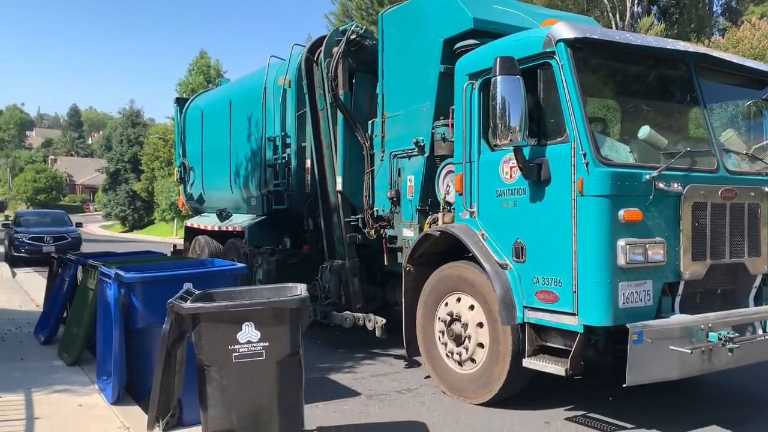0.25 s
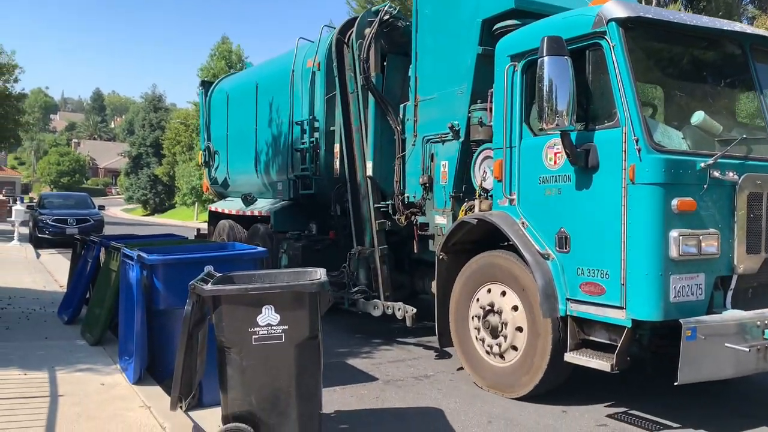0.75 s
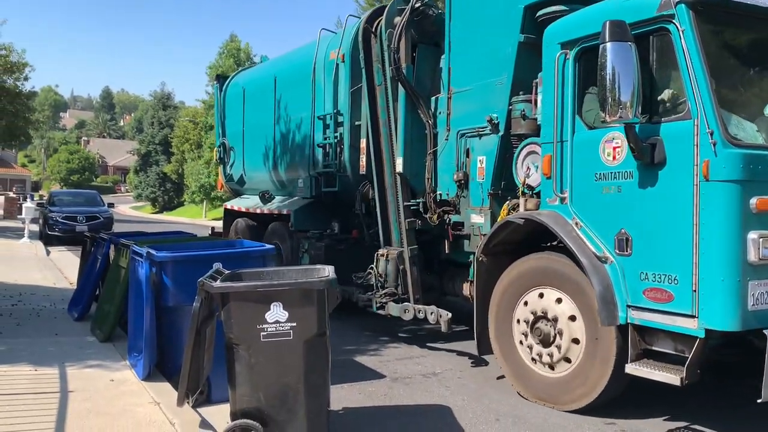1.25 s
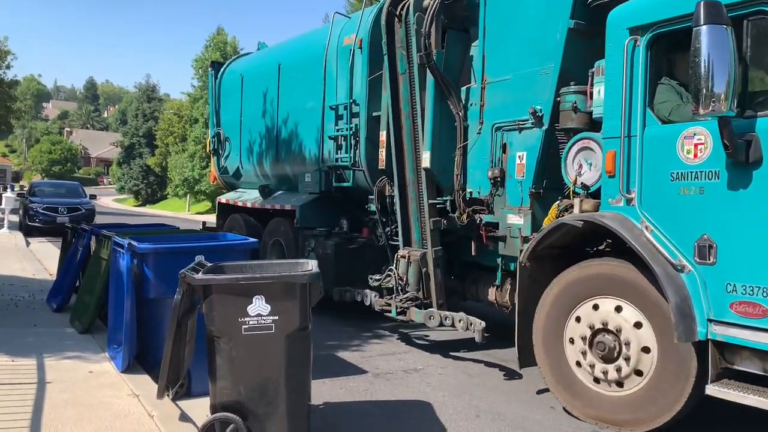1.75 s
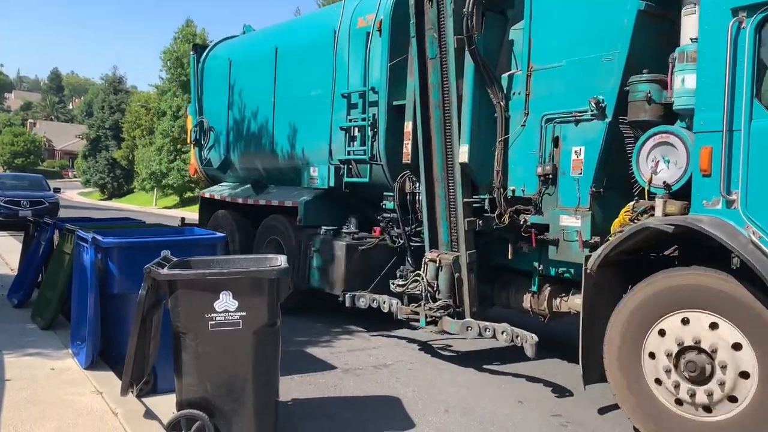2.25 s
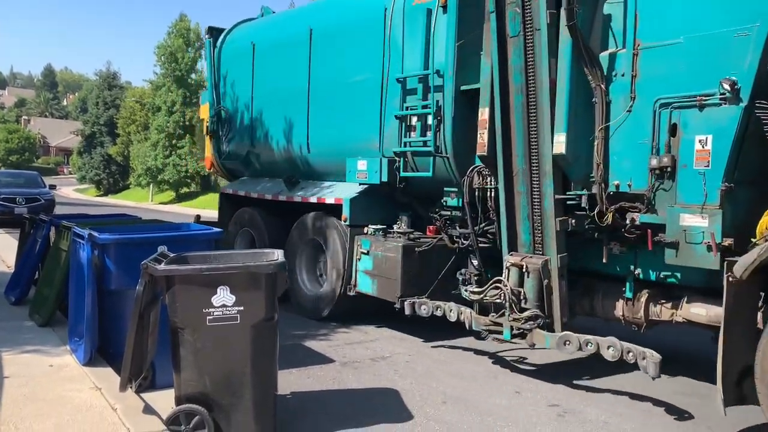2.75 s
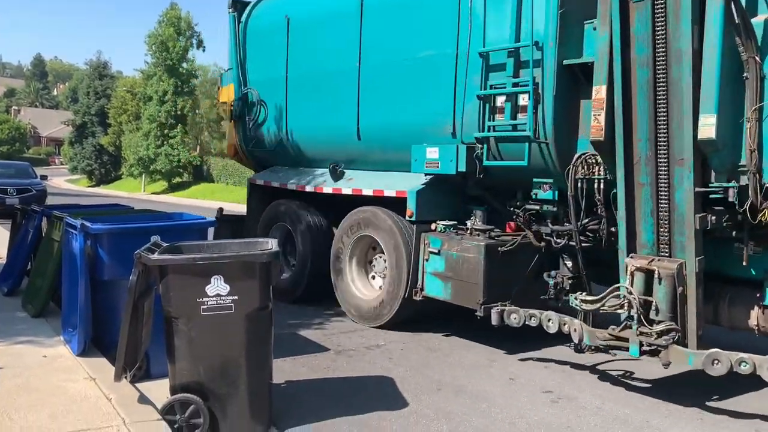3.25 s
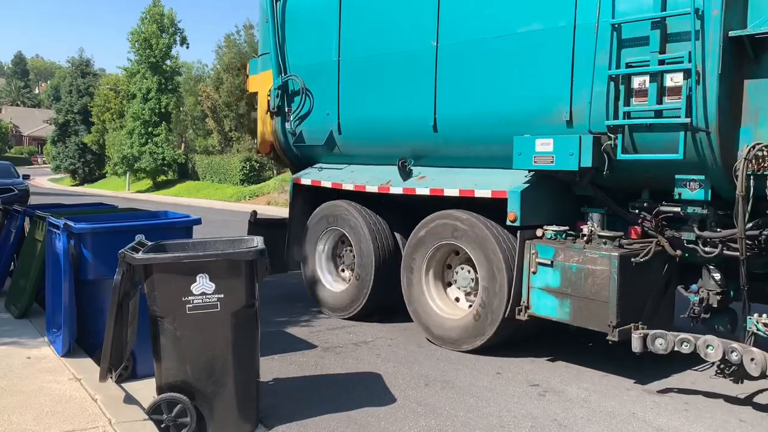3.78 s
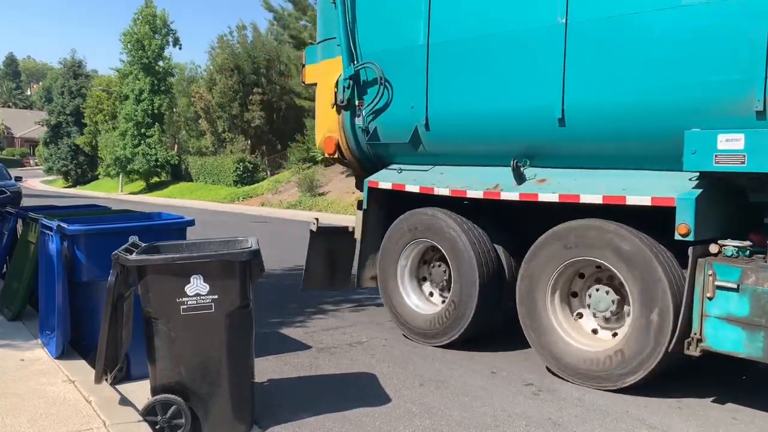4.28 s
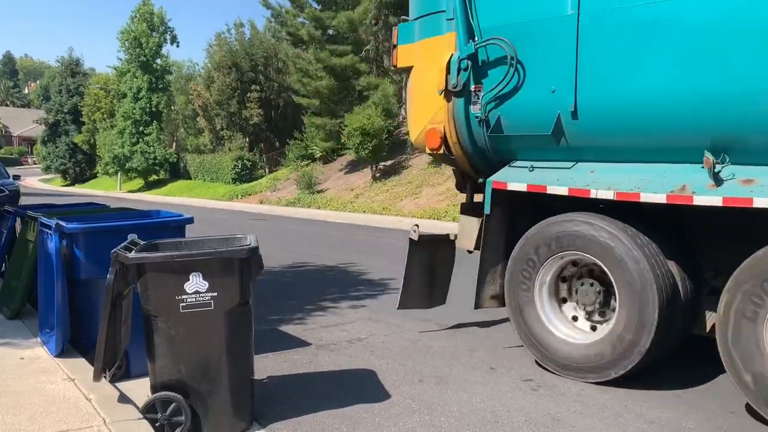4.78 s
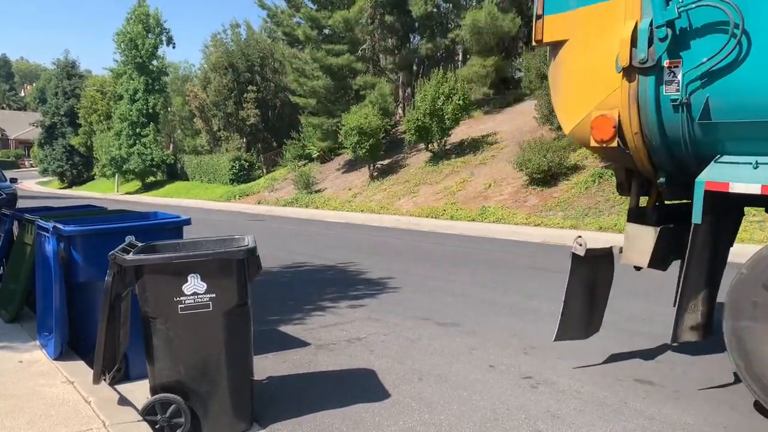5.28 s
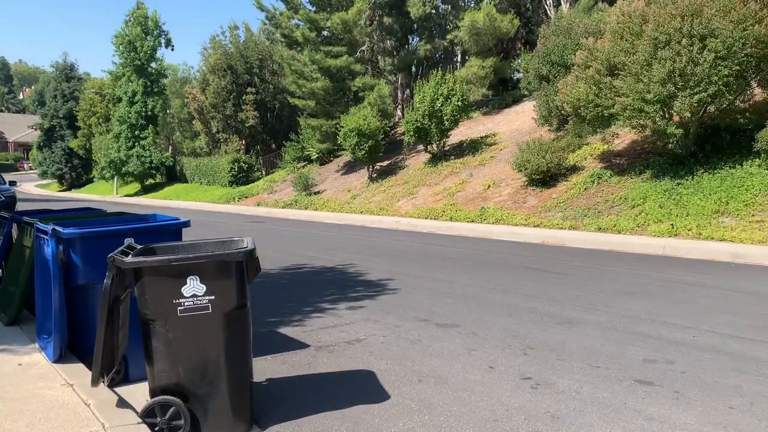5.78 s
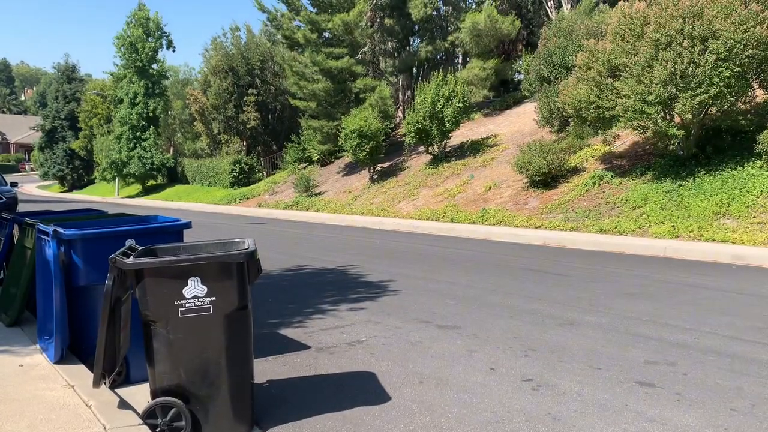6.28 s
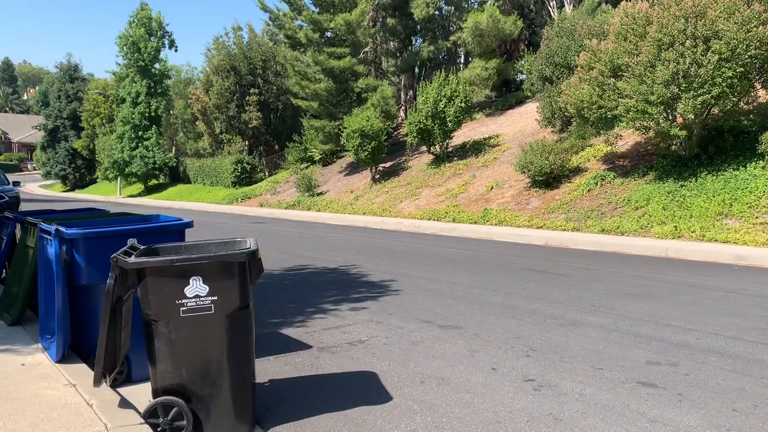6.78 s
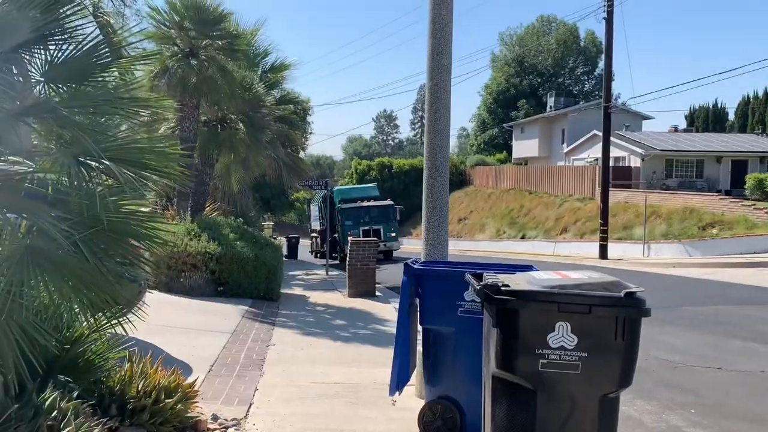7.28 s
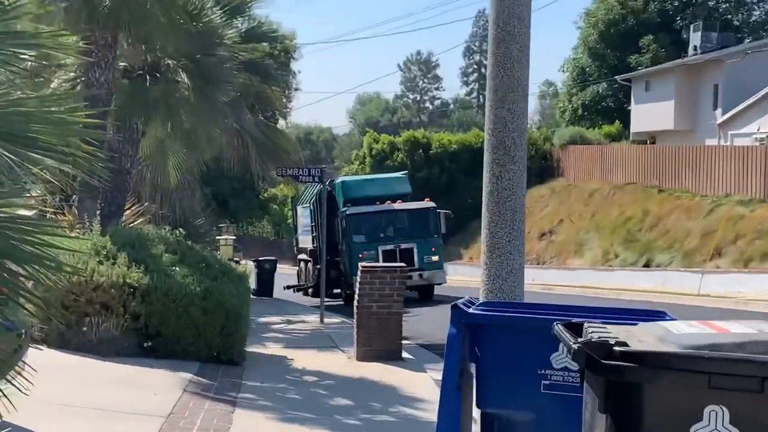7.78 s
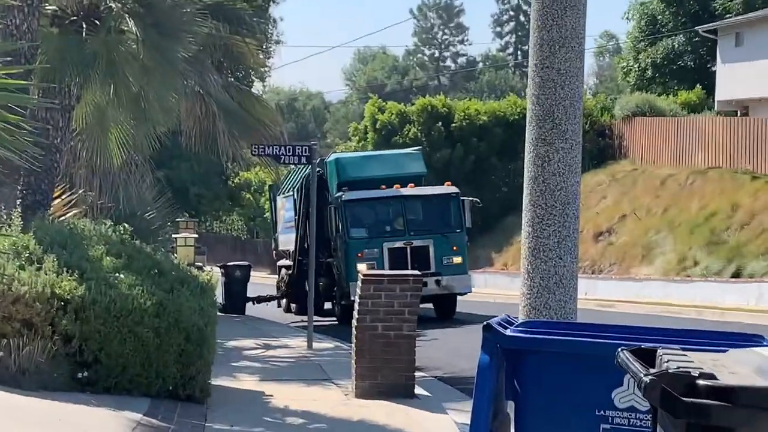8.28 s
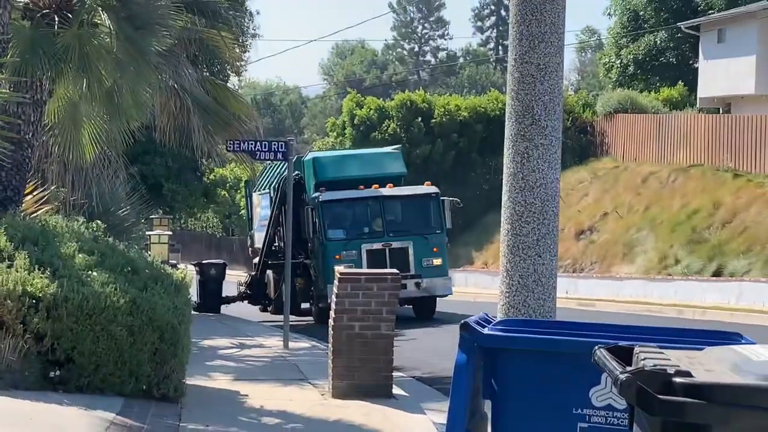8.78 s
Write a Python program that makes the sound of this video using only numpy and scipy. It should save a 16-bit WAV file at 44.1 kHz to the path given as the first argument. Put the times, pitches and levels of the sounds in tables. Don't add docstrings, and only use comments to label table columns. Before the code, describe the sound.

A heavy diesel refuse truck accelerates past close by, engine drone and gear whine climbing, then abruptly a farther truck works with hydraulic whine and knocks.

```python
import sys
import numpy as np
from scipy import signal
from scipy.fft import rfft, irfft, next_fast_len
from scipy.io import wavfile
from scipy.ndimage import uniform_filter1d

SR = 44100
rng = np.random.default_rng(int(sys.argv[2]) if len(sys.argv) > 2 else 0)


def to_wav(sig):
    pcm = np.clip(np.atleast_2d(sig), -1, 1) * 32767
    pcm = np.round(pcm).astype(np.int16)
    wavfile.write(sys.argv[1], SR, pcm.T)


def magnitude_from_level(level_db):
    exponent = np.asarray(level_db, float) / 20
    return 10 ** exponent


N = 398663
T = np.arange(N) / SR
SIZE = next_fast_len(N)
HZ = np.maximum(np.fft.rfftfreq(SIZE, 1 / SR), 1)
CUT_S, CUT_FADE_S = 6.954, .02
FAN, MESH = 4.29, 32.38


def columns(table):
    s, *rest = np.transpose(table)
    return [np.interp(T, s, c) for c in rest]


def on_log_hz(table, hz):
    f, value = np.transpose(table)
    return np.interp(np.log(hz), np.log(f), value)


def unit(x):
    return x / np.sqrt(np.mean(np.abs(x) ** 2))


def band(x, lo_hz, hi_hz):
    return signal.sosfilt(signal.butter(2, [lo_hz, min(hi_hz, .45 * SR)], "band", fs=SR, output="sos"), x)


def walk(rate_hz, size=N):
    k = max(int(SR / rate_hz), 1)
    held = np.repeat(rng.standard_normal(size // k + 2), k)
    slewed = uniform_filter1d(uniform_filter1d(held, k), k)
    return unit(slewed[:size])


def tone(turns, wander_hz, depth):
    size = len(turns)
    drift = (walk(wander_hz, size=size) + 1j * walk(wander_hz, size=size)) / np.sqrt(2)
    shape = np.sqrt(1 - depth ** 2) + depth * drift
    return np.sqrt(2) * np.real(shape * np.exp(2j * np.pi * (turns + rng.random())))


def late(x, lag):
    return np.interp(np.arange(N) - lag, np.arange(N), x)


def ports(x, lag, hz):
    stretch = np.interp(hz, [350, 1600, 3500, 5000], [2.2, 1.05, 0.85, 0.011])
    return np.array([late(x, lag * stretch), x])


# t/s, firing rate f/Hz
NEAR_SPEED = [(0, 37.66), (.25, 42.6), (.5, 46.5), (.75, 49.5), (1.05, 51.9), (1.5, 54.3), (1.95, 56.6),
              (2.6, 61.3), (3.0, 63.7), (3.8, 68.3), (4.6, 73.55), (5.4, 79.8), (5.75, 83.5), (6.2, 89.8),
              (6.45, 92.4), (6.65, 93.5), (6.8, 91.9), (6.95, 90.7)]
# t/s, gear mesh f/Hz
FAR_SPEED = [(6.97, 1090), (7.32, 1190), (7.61, 1120), (7.75, 1260), (7.82, 1385), (7.93, 1480),
             (8.05, 1365), (8.17, 1225), (8.45, 1200), (8.8, 1220), (8.93, 1490), (9.04, 1640)]


def engine_speed():
    near_hz, = columns(NEAR_SPEED)
    mesh_hz, = columns(FAR_SPEED)
    flywheel_s = .08
    return near_hz, uniform_filter1d(mesh_hz, int(flywheel_s * SR)) / MESH


# f/Hz, width/Hz, level/dB
CAB = [(78, 20.8, 26), (103, 6.7, 2), (198.2, 14.4, 24.5), (228.4, 23.4, 22), (271, 31, 18), (343, 31, 15),
       (395, 22, 15), (800, 260, 18), (990, 71, 19.5), (1083, 140, 24), (1341, 13, 21)]
# f/Hz, width/Hz, level/dB
CASING = [(1545, 390, 25), (1854, 70, 29.5), (2144, 230, 32), (2230, 33, 19), (2295, 45, 27),
          (2464, 120, 28.5), (2544, 420, 24.5), (2818, 270, 24.5), (4260, 180, 29), (4470, 800, 27.5)]


def ringing(hz):
    grid = np.arange(7000.)
    power = sum(magnitude_from_level(2 * db) / (1 + (2 * (grid - f) / width) ** 2) ** 2 for f, width, db in CAB + CASING)
    return np.interp(hz, grid, 10 * np.log10(1 + power))


def tone_levels(firing_hz, drive_db, orders, mix):
    return [db + drive * drive_db + ring * ringing(k * firing_hz)
            for (k, *_), (db, drive, ring) in zip(orders, mix)]


# multiple of firing rate, middle t/s,
# length/s, level/dB
TONE_SWELLS = [(MESH, 2.17, 0.082, 7.5), (MESH, 2.45, 0.3, -6), (MESH, 4.2, 0.14, 3.4), (MESH, 3.8, .1, -2),
               (MESH, 3.7, 0.22, 3.6), (MESH, 4.1, 0.075, -6), (MESH, 4.87, .2, 2), (MESH, 5.02, .04, -12),
               (MESH, 5.15, .15, 1), (MESH, 5.41, .06, -10), (MESH, 5.59, .1, -9), (MESH, 5.75, .1, -1),
               (MESH, 5.84, .05, -11), (MESH, 5.94, .09, 2), (MESH, 6.03, .06, -8), (MESH, 6.13, .11, 2),
               (MESH, 6.45, .08, -11), (MESH, 6.81, .05, -6), (MESH, 6.89, .07, 2), (MESH, .95, .25, 3),
               (MESH, 6.25, .04, -8), (MESH, 7.87, .15, 4), (MESH, 7.72, .1, 2), (MESH, 8.95, .1, 4),
               (MESH, 8.52, .08, -6), (FAN, .68, .12, -6), (FAN, 2.4, .3, -9), (FAN, 3.1, .6, 3),
               (FAN, 5.41, .16, -8), (FAN, 5.58, .12, 5), (FAN, 5.86, .26, -3), (FAN, 6.25, .35, 4),
               (FAN, 6.7, 0.21, -16), (FAN, 6.92, 0.045, 4), (FAN, 6.9, 0.36, 4.6), (3, 2.32, 0.43, 5.8),
               (3, 5.05, 0.071, 4), (3, 7, 0.6, -5), (3, 6.5, 1.2, -4), (FAN, 1.6, 1, 1.9), (FAN, 5.25, .15, 2),
               (2, 7.35, .15, 4), (2, 8.09, .2, -16), (2, 6.4, .7, -8), (1, 6.9, .08, 3), (3, 6.35, .6, -4),
               (15.54, 3.75, .5, 5), (MESH, 6.7, .25, 1), (15.54, 6.4, 1.2, -8), (15.54, 1.2, 1.0, -4),
               (2 * FAN, 1.48, 0.16, 9), (2 * FAN, 0.89, 0.25, 4), (2 * MESH, 5.3, 1.4, -5),
               (2, 8.36, 0.16, 2.8), (2, 7.7, 0.2, 2), (2, 9, .05, -9), (2, 8.75, 0.17, 3.8),
               (15.54, 2.0, .9, -9), (15.54, .35, .4, -8), (15.54, 3.35, .2, -6), (15.54, 4.6, .4, -8),
           (15.54, 1.1, .4, 3), (2 * MESH, 2.8, .5, -8), (2 * MESH, 4.4, .35, -8), (2 * MESH, 4.05, .25, 2),
           (2 * MESH, 3.68, .12, -5), (MESH, 7.55, .16, 3), (MESH, 8.06, .12, -4), (MESH, 7.28, .12, -2),
           (MESH, .82, .06, -8), (MESH, 1.15, .16, -7), (MESH, .35, .12, -5), (MESH, .66, .2, -2),
           (MESH, 1.7, .12, -5), (MESH, 2.38, .1, -8), (MESH, 2.25, .08, 4), (MESH, 2.85, .3, -3),
           (MESH, 8.3, .3, 2), (MESH, 8.72, .15, 3), (15.54, 2.95, .5, -3), (FAN, 8.0, .4, 5),
           (2, 7.55, .2, -4), (2, 8.95, .2, 6), (2 * MESH, 3.78, .1, -4), (3, 3.9, .3, 3), (3, 4.6, .3, 2),
           (3, 6.15, .2, -4), (MESH, 4.66, .1, 6), (MESH, 3.02, .1, -4), (MESH, 3.72, .08, -4),
           (MESH, 3.55, .2, 2), (MESH, 7.72, .14, 2), (MESH, 7.43, .1, -4), (2 * MESH, 4.65, .3, -6),
           (MESH, 4.22, .08, 5)]


def tone_swell(order):
    return sum(db * np.exp(-(2 * (T - t) / length) ** 2)
               for k, t, length, db in TONE_SWELLS if abs(k - order) < .3)


# offset in firing orders, level/dB under the mesh
SIDEBANDS = [(-4, -16), (-2, -15), (-1 / 3, -19), (2, -14), (4, -17)]


def machinery(firing_hz, levels_db, orders, strand_db, side_db):
    turns = np.cumsum(firing_hz) / SR
    out = 0
    for db, (k, wander_hz, depth) in zip(levels_db, orders):
        patch_db = (1.5 + .05 * T) * np.minimum(walk(14), 1) * (k == MESH) * (T < CUT_S)
        out = out + magnitude_from_level(db + patch_db + tone_swell(k)) * tone(k * turns, wander_hz, depth)
    sides = magnitude_from_level(-5.5) * tone(MESH * turns, wander_hz=263.7, depth=0.96)
    for k, db in SIDEBANDS:
        ring_db = .45 * (ringing((MESH + k) * firing_hz) - ringing(MESH * firing_hz))
        sides = sides + magnitude_from_level(db + ring_db) * tone((MESH + k) * turns, wander_hz=30, depth=0.85)
    strand = magnitude_from_level(levels_db[-1] + strand_db) * tone((orders[-1][0] - 4.5) * turns, wander_hz=350, depth=.97)
    fan = [k for k, *_ in orders].index(FAN)
    overtone = magnitude_from_level(levels_db[fan] - 8.0 + tone_swell(2 * FAN)) * tone(2 * FAN * turns, wander_hz=12, depth=0.54)
    return out + magnitude_from_level(levels_db[-2] + side_db + .5 * tone_swell(MESH)) * sides + strand + overtone


# multiple of firing rate, wander f/Hz, wander depth 0-1
NEAR_ORDERS = [(1, 5, .08), (1.5, 6, .2), (2, 6, .3), (3, 40, .85), (FAN, 6, .2), (15.54, 50, .55),
               (MESH, 80, .45), (2 * MESH, 150, .88)]
# level/dB, share of closeness, share of panel ringing
NEAR_MIX = [(-50.5, 0.1, 0.98), (-45.5, 0.11, 1.05), (-39.5, 0.5, 0.9), (-44, 1, 0.99), (-51.5, 0.48, 0.95),
            (-53.5, 0.72, 0.89), (-62, 0.8, 0.8)]


def near_tones(firing_hz, exhaust_db, close_db):
    levels_db = [exhaust_db] + tone_levels(firing_hz, close_db, NEAR_ORDERS[1:], NEAR_MIX)
    return machinery(firing_hz, levels_db, NEAR_ORDERS, strand_db=-6, side_db=-4)


# multiple of firing rate, wander f/Hz, wander depth 0-1
FAR_ORDERS = [(2, 8, .15), (3, 8, .5), (FAN, 8, .25), (MESH, 70, .62), (2 * MESH, 120, .82)]
# level/dB, share of rev gain, share of panel ringing
FAR_MIX = [(-53.5, -1.5, 0.95), (-50, -3.5, .1), (-50, 1, 0.56), (-46.5, -0.4, .02), (-63, -1.5, .02)]
# t/s, pressure level/dB, strain level/dB that moves the whine up an octave
ARM = [(6.97, -13, -4), (7.15, -10, -4), (7.27, 1, -3), (7.66, 0, -4), (7.76, 1, 14), (7.9, -5, 13),
       (8.05, -6, 15), (8.2, 1.5, 14), (8.4, -1, 3), (9.04, -1, -3)]


def far_tones(firing_hz, rev_db):
    *low_db, mesh_db, octave_db = tone_levels(firing_hz, rev_db, FAR_ORDERS, FAR_MIX)
    pressure_db, strain_db = columns(ARM)
    levels_db = low_db + [mesh_db + pressure_db, octave_db + strain_db]
    return machinery(firing_hz, levels_db, FAR_ORDERS, strand_db=-14, side_db=-5)


# t/s, lag of the left port/samples
GEAR_BEARING = [(0, 5.5), (2.2, 5.5), (2.45, 8.5), (3.1, 7.5), (3.5, 5.5), (3.62, 5.5), (3.8, 11),
                (4.4, 10.5), (4.62, 11.5), (4.75, 15), (5.0, 16), (5.6, 14), (5.95, 19), (6.94, 19),
                (6.97, -6), (9.04, 1)]


def placed(tones, lag):
    def split(order, hz, kind):
        return signal.sosfiltfilt(signal.butter(order, hz, kind, fs=SR, output="sos"), tones)
    bass, whine, top = split(2, 600, "low"), split(4, [1400, 3400], "band"), split(4, 3400, "high")
    gear_lag, = columns(GEAR_BEARING)
    out = ports(bass, lag, 300) + ports(tones - bass - whine - top, lag, 1300)
    return out + ports(top, lag, 4600) + ports(whine, gear_lag, 2260)


# start t/s, end t/s, offset in firing orders, level/dB
FLARES = [(3.202, 3.7, 2, -40), (3.823, 3.98, 2, -32), (4.147, 4.28, 1.3, -33), (4.532, 4.678, 2, -33),
          (4.4, 4.55, 4, -42), (4.707, 5.4, 4, -39), (4.78, 5.0, -4, -33), (4.938, 5.123, -2, -33),
          (5.1, 5.32, 2, -38), (5.42, 5.65, -4, -40), (3.05, 3.22, -2, -34)]


def flares(turns):
    out = np.zeros(N)
    for t0, t1, k, db in FLARES:
        a, b = int(t0 * SR), int(t1 * SR)
        order = MESH + np.round(3 * k) / 3
        out[a:b] += magnitude_from_level(db) * signal.windows.tukey(b - a, .6) * tone(order * turns[a:b], 40, .35)
    return out


ROAR_HZ = [250, 850, 2800, 7500, 13000]
# f/Hz, width/Hz, level/dB
BODY = [(370, 324, 0.5), (900, 570, 3), (2320, 280, 0), (4110, 390, 3.5)]
# f/Hz, share 0-1
LIKENESS = [(60, .97), (200, .93), (500, .65), (1200, .55), (2500, .5), (4500, .3), (7500, .4),
            (10000, .62), (14000, .92)]
# f/Hz, middle t/s, length/s, level/dB
ROAR_SWELLS = [(270, .15, .3, 3), (260, 1.4, .3, -2), (248, 1.96, 0.31, 4), (343, 2.81, 0.4, 4),
               (710, 3.13, 0.63, -5.5), (256, 3.66, .3, 1.5), (277, 5.3, 0.85, 1), (265, 6.25, 1.1, 5.5),
               (500, 6.45, .7, -1.5), (1000, 6.2, 0.27, -3), (3300, 6.68, 0.43, 4), (500, 5.5, 0.39, -5),
               (13100, 8.2, 0.31, 1), (13000, 1.3, 2.2, -1), (700, 1.76, 0.65, -1), (290, 8.5, 1.2, 2.5),
               (8100, 4.5, 11, 1.5), (150, 7.92, .25, -4.5), (200, 2, .4, 4), (1000, 3.2, 0.51, 4),
               (1100, 0.78, 1.2, -1.5), (5500, 3.3, 1.2, 2.5), (270, 7.45, .4, 3.5), (3170, 5.7, 0.78, 3.5),
               (600, 6.02, .4, 3.5), (270, 5.9, .4, 3), (396, 5.4, .3, -2.5), (400, 4.42, 0.33, 3),
               (5500, 8.5, .35, -3), (450, 7.05, 0.35, -3.5), (1700, 4, 0.66, -1.5), (3500, 6.4, .4, 2),
               (2300, 6.7, 0.74, -2), (5500, .9, .5, 1)]


def roar(turns, moves_db, colour, lag, trim_db, throb):
    body_db = sum(db / (1 + (2 * (HZ - hz) / width) ** 2) for hz, width, db in BODY)
    rumble_db = -14 * np.clip(np.log2(colour[0][0] / HZ), 0, None)
    shape = magnitude_from_level(on_log_hz(colour, HZ) + body_db + rumble_db + trim_db)
    noise = rfft(rng.standard_normal((3, SIZE))) * shape
    sunk_db = -6 * np.clip((T - 5.75) / .4, 0, 1) * (T < CUT_S)
    swell, out = walk(1.37), 0
    for hz in 32 * 2 ** np.arange(0, 9.5, .5):
        place = np.interp(np.log(hz), np.log(ROAR_HZ), np.arange(5))
        low = min(int(place), 3)
        db = moves_db[low] + (place - low) * (moves_db[low + 1] - moves_db[low])
        db = db + 0.058 * swell + 1.42 * walk(9)
        db = db + sunk_db * np.exp(-(np.log2(hz / 190) / .3) ** 2)
        for f, t, length, lift_db in ROAR_SWELLS:
            octaves = np.log2(hz / f)
            if abs(octaves) < .8:
                db = db + lift_db * np.exp(-(octaves / .4) ** 2) * np.exp(-(2 * (T - t) / length) ** 2)
        slice_ = np.cos(np.pi * np.clip(np.log2(HZ / hz), -.5, .5))
        direct, left, right = irfft(noise * slice_, SIZE)[:, :N]
        share = np.clip(on_log_hz(LIKENESS, hz), 0, 1)
        diffuse = np.array([left, right])
        out = out + magnitude_from_level(db) * (np.sqrt(share) * ports(direct, lag, hz) + np.sqrt(1 - share) * diffuse)
    return out * (1 + throb * np.cos(2 * np.pi * turns) + throb * np.cos(np.pi * turns))


# f/Hz, level/dB per Hz
NEAR_COLOUR = [(100, -10.5), (130, -13), (210, -6.5), (295, -13.5), (373, -10.5), (660, -21.5), (840, -21),
               (1170, -23), (2330, -27.5), (3300, -36), (5200, -43.5), (10000, -46), (13500, -47)]
CLOSE_SHARE = [0.64, 0.92, 0.92, 0.35, 0.44]
VIEW_SHARE = [0.11, 0.0082, 0.37, 1.06, 1.23]


def near_roar(turns, close_db, view_db, lag):
    moves_db = np.outer(CLOSE_SHARE, close_db) + np.outer(VIEW_SHARE, view_db)
    return roar(turns, moves_db, NEAR_COLOUR, lag, trim_db=4.0, throb=.16)


# start t/s, hold/s, level/dB
VENTS = [
    (7.17, 0.035, 6.5),
    (8.062, 0.078, 14.5),
]


def vents():
    pop_s, attack_s, release_s = 0.011, 0.069, 0.19
    out = 0
    for t, hold_s, db in VENTS:
        edges = np.cumsum([t, pop_s, attack_s, hold_s, release_s])
        out = out + db * np.interp(T, edges, [0, 0.59, 1, 1, 0])
    return out


# f/Hz, level/dB per Hz
FAR_COLOUR = [(40, -7), (70, -6), (146, -5), (419, -19.5), (611, -18), (890, -29.5), (1150, -26),
              (2120, -33), (2620, -27), (3320, -36), (6260, -37.5), (10000, -43.5), (13500, -46.5)]
REV_SHARE = [0.85, 0.9, 0.22, 0.49, 0.33]
AIR_SHARE = [.01, .1, .55, 1.01, 1.3]


def far_roar(turns, rev_db, lag):
    moves_db = np.outer(REV_SHARE, rev_db) + np.outer(AIR_SHARE, vents() - 4)
    return roar(turns, moves_db, FAR_COLOUR, lag, trim_db=-6, throb=0.038)


# t/s, peak level/dB
LOUD_TICKS = [(0.4868, -40), (0.6509, -35), (0.7731, -36), (1.3134, -39), (1.4596, -34), (1.5329, -36),
              (1.6447, -38), (1.7888, -34), (1.9989, -26), (2.1101, -32), (2.175, -28), (2.2139, -30),
              (2.2752, -34), (2.3062, -28), (2.377, -35), (2.4144, -27), (2.4828, -30), (2.5092, -26),
              (2.5755, -34), (2.7053, -28), (2.8, -35), (2.8689, -37), (2.9327, -34), (3.1143, -31),
              (3.1507, -35), (3.1762, -32), (3.241, -29), (3.269, -34), (3.3603, -35), (3.6306, -34),
              (3.8422, -32), (3.8955, -30), (3.9823, -24), (4.2393, -31), (4.3216, -28), (5.1262, -29)]


def valves(turns, view_db):
    tick_s = .012
    hit = np.diff(np.floor(turns / 2), prepend=0) > 0
    puff = signal.lfilter([1], [1, -np.exp(-1 / (tick_s * SR))], hit * magnitude_from_level(2.5 * rng.standard_normal(N)))
    db = -51 + view_db - 4 * np.maximum(T - 3, 0)
    loud = sum((T >= t) * magnitude_from_level(peak - 60 * np.clip(T - t, 0, 1) / 0.067) for t, peak in LOUD_TICKS)

    def ring(x):
        return unit(band(band(x, 9540, 10560), 7250, 11200)) + magnitude_from_level(-9) * unit(band(x, 13000, 14300))
    return magnitude_from_level(db) * ring(puff * rng.standard_normal(N)) + magnitude_from_level(-6.0) * loud * ring(rng.standard_normal(N))


def burst(t, db, lo_hz, hi_hz, t60):
    fade = (T >= t) * magnitude_from_level(-60 * np.clip(T - t, 0, None) / t60)
    return magnitude_from_level(db) * fade * unit(band(rng.standard_normal(N), lo_hz, hi_hz))


# t/s, peak level/dB, ring f/Hz, t60/s
KNOCKS = [(7.242, -34, 3000, 0.093), (7.358, -31, 900, 0.17), (7.389, -29.5, 990, 0.42),
          (7.427, -33, 4500, 0.032), (7.494, -28.5, 900, 0.52), (8.142, -28, 900, 0.22),
          (8.599, -28.5, 1470, 0.22), (8.922, -37, 900, 0.18), (6.095, -20, 500, 0.054),
          (.487, -42, 7140, 0.016), (1.533, -35, 6200, .02)]


def knocks():
    out = sum(burst(t, db - 2.5, hz / 7.0, hz * 1.35, t60) for t, db, hz, t60 in KNOCKS)
    return out + burst(7.22, -50, 12500, 14300, .7)


# start t/s,
# end t/s, start f/Hz, end f/Hz, level/dB
WHISTLES = [(1.05, 1.65, 5900, 6700, -57), (2.7, 3.6, 7700, 8900, -50), (5.9, 7.0, 12100, 13950, -48),
            (2.16, 2.28, 10600, 10300, -40), (2.2, 2.27, 5300, 5100, -47), (6.96, 7.05, 7050, 7050, -55),
            (6.99, 7.11, 9000, 9000, -64), (8.66, 8.71, 10200, 9900, -57), (.1, .2, 3900, 3950, -55),
            (7.35, 7.56, 785, 770, -46), (7.96, 8.08, 1400, 1370, -52)]
# start t/s, end t/s, start f/Hz, end f/Hz, level/dB
BUZZ = [(3.02, 3.65, 4200, 4300, -45), (3.55, 4.7, 4400, 4420, -47), (4.15, 4.55, 4380, 4450, -44),
        (1.05, 1.6, 1600, 1700, -40), (1.75, 2.2, 980, 1000, -36.5)]
CHIRPS_S = [7.652, 7.715, 7.762, 7.818]
# length/s, start f/Hz, end f/Hz, level/dB
CHIRP = (.023, 4420, 4250, -50)


def whistles():
    out = np.zeros(N)
    notes = [(t, t + CHIRP[0], *CHIRP[1:]) for t in CHIRPS_S]
    for rows, wander in ((WHISTLES, .008), (notes, .16), (BUZZ, .1)):
        for t0, t1, hz0, hz1, db in rows:
            a, b = int(t0 * SR), int(t1 * SR)
            glide = np.cumsum(np.linspace(hz0, hz1, b - a)) / SR
            out[a:b] += magnitude_from_level(db) * signal.windows.tukey(b - a, .5) * tone(glide, wander * hz0, .85)
    return out


# t/s, peak level/dB
GRIT = [(2.3064, -22), (2.5885, -26), (2.7047, -24), (2.9376, -25), (3.1144, -33), (3.4909, -29)]


def grit():
    out = 0
    for t, db in GRIT:
        scatter = burst(t + .003, db - 13, 5500, 11000, .05)
        out = out + burst(t, db - 3, 9500, 15500, .009) + band(scatter, 5000, 10800)
    return out


def wake():
    db = -33 + 4 * np.minimum(T - 6.2, 0)
    return magnitude_from_level(db + 1.6 * walk(7.9)) * unit(band(rng.standard_normal(N), 49, 71))


# t/s, exhaust outlet level/dB, closeness/dB, clear view of the engine bay/dB
PASS = [(0, -44, -13.5, -3.5), (.16, -38, -10.5, -4), (.6, -23, -5, -4), (1.15, -18.5, -1.5, -1),
        (1.9, -17.5, -.5, 2.5), (2.6, -13, 0, 3.5), (3.3, -11, 3, 6), (3.8, -10, 3.5, 5.5),
        (4.85, -11, 3, 3), (5.12, -14.5, 2.5, 2.5), (5.85, -12, 2.5, 1), (6.1, -21.5, 4, -0.5),
        (6.3, -16, 4.5, -0.5), (6.95, -14.5, -0.5, -0.5)]
# t/s, lag of the left port/samples
BEARING = [(0, 0.5), (1, 1.5), (3.6, 6), (4.1, 10.5), (4.6, 10.5), (6.94, 13.5), (6.97, -2.5), (9.04, -1)]


def scene():
    lag, = columns(BEARING)
    exhaust_db, close_db, view_db = columns(PASS)
    far_share = np.clip((T - CUT_S) / CUT_FADE_S, 0, 1)
    near_share = magnitude_from_level(-60 * far_share)
    near_hz, far_hz = engine_speed()
    rev_db = 14 * np.log2(far_hz * MESH / 1265)
    turns, far_turns = np.cumsum(near_hz) / SR, np.cumsum(far_hz) / SR
    tones = near_share * near_tones(near_hz, exhaust_db, close_db) + far_share * far_tones(far_hz, rev_db)
    near = near_roar(turns, close_db, view_db, lag) + valves(turns, view_db) + wake()
    out = placed(tones, lag) + near_share * (T < CUT_S + CUT_FADE_S) * near
    out = out + far_share * far_roar(far_turns, rev_db, lag)
    return out + knocks() + whistles() + ports(flares(turns), lag / 3, 2400)


# low f/Hz, high f/Hz, share of blocks 0-1
DROPOUTS = [(5000, 5500, .07), (7100, 7400, .06), (8500, 8900, .05), (11120, 11600, .68),
            (12150, 12500, .25), (14000, 14700, .3)]


def dropouts(x):
    block = 1024
    mid = rfft(x.mean(axis=0), SIZE)
    for lo, hi, share in DROPOUTS:
        chance = uniform_filter1d(rng.standard_normal(N // block + 1), size=2)
        gone = np.repeat(chance < np.quantile(chance, share), block)[:N] * 1.
        x = x - uniform_filter1d(gone, size=block // 2) * irfft(mid * (HZ > lo) * (HZ < hi), SIZE)[:N]
    return x


def roll_off(x):
    return signal.sosfilt(signal.butter(12, 15620, fs=SR, output="sos"), x)


# f/Hz, level/dB
MIC = [(4700, 0), (5300, -4), (5800, 1), (6800, 0), (7250, -4), (7700, 0), (8450, 0), (8750, -4), (9050, 0),
       (11100, 0), (11400, -5), (11500, -40), (12300, -40), (12450, -1), (14300, -3), (14600, -70)]
# f/Hz, phase/rad
PORT_PHASE = [(5000, 0), (6000, -.3), (7700, -1.6), (8800, -1.6), (9600, 1.2), (11000, 1.4), (12300, 1.8),
              (13100, 1.5), (16000, 1.5)]


def record(dry):
    balance_db = on_log_hz([(100, 1.0), (400, 0.19), (700, 0.91), (2000, 0.029), (4400, 0.69), (12000, 0.12)], HZ)
    left = magnitude_from_level(-balance_db) * np.exp(1j * on_log_hz(PORT_PHASE, HZ))
    x = irfft(rfft(dry, SIZE) * np.array([left, magnitude_from_level(balance_db)]), SIZE)
    x = signal.sosfilt(signal.butter(2, 28, "high", fs=SR, output="sos"), x)
    x = x / (1 + (x / .93) ** 4) ** (1 / 4)
    x = irfft(rfft(x) * magnitude_from_level(on_log_hz(MIC, HZ)), SIZE)[:, :N]
    return roll_off(dropouts(x) + grit())


dry = scene()
out = record(dry)
to_wav(out)
```